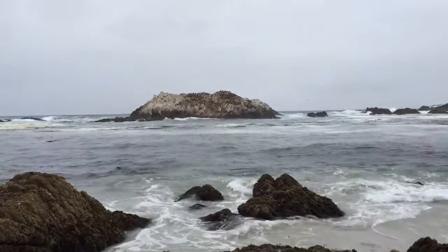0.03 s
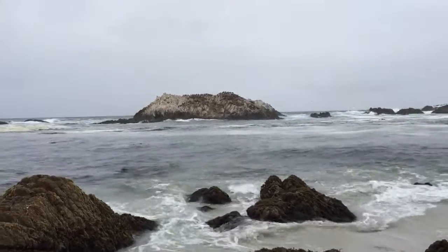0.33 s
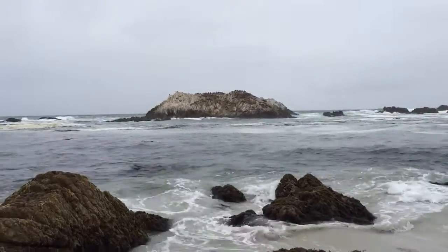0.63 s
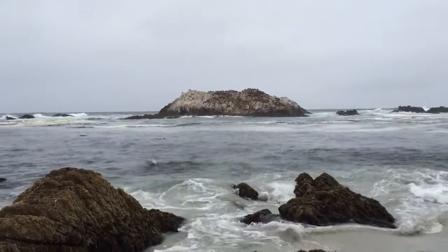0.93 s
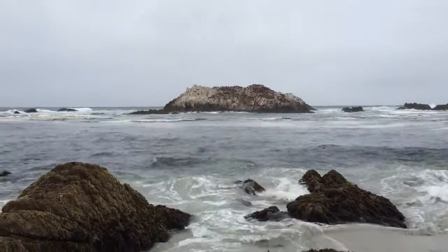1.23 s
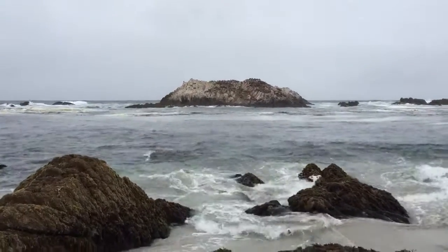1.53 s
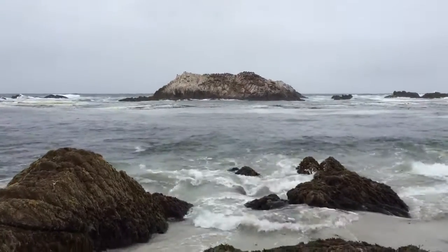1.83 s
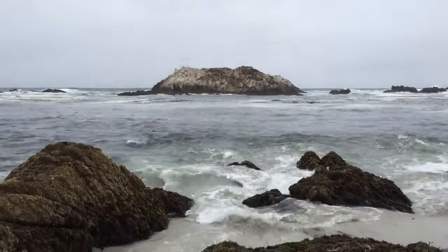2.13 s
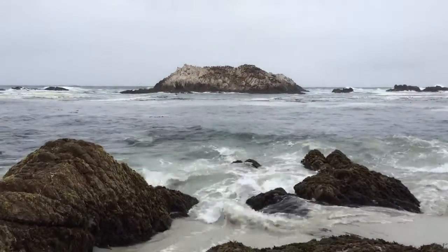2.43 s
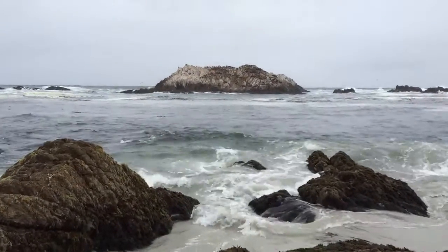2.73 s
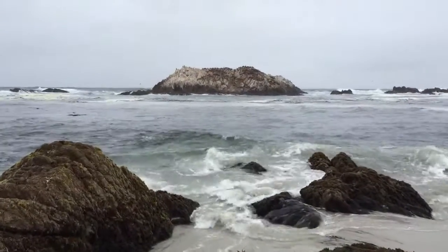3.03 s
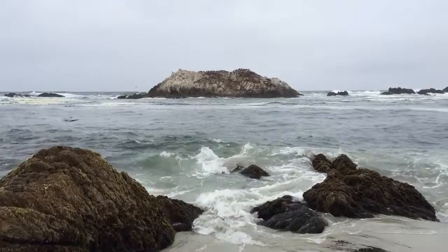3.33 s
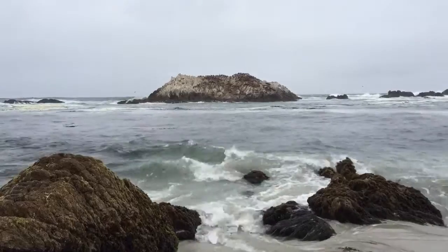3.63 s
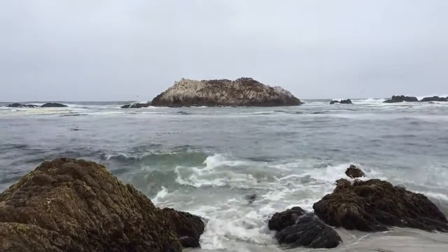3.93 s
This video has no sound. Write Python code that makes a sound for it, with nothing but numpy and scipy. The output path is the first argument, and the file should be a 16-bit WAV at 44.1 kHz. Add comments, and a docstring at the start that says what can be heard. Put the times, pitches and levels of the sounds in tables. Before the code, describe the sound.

Ocean surf roars steadily around shore rocks for the whole four seconds, with gusty wind rumbling on the microphone. Short wind thumps come irregularly, strongest at about 1.4 and 3.1 seconds. A few faint splashes spatter close by around 1.2 seconds. Foam hisses, bubbles and fizzes between the rocks, building from about 1.5 seconds and loudest near the end as the next wave approaches.

```python
"""A steady roar of breakers on shore rocks, under gusts of wind that rumble on the microphone.
Single eddies thump the microphone as smooth pressure pulses.
Foam washes in between the rocks: its bubbles ring and its froth bursts, hissing and fizzing
louder as the next wave draws near. A few small splashes spatter close by."""
import sys
import numpy as np
from scipy import signal
from scipy.fft import rfft, irfft
from scipy.io import wavfile
from scipy.ndimage import uniform_filter1d

SR = 44100
rng = np.random.default_rng(int(sys.argv[2]) if len(sys.argv) > 2 else 0)


def wav_out(sig):
    """Save sig, one row per channel (or a flat mono array), as 16-bit PCM at SR to the path in sys.argv[1]."""
    wavfile.write(sys.argv[1], SR, np.round(np.clip(np.atleast_2d(sig).T, -1, 1) * 32767).astype(np.int16))


N = 176400
T = np.arange(N) / SR
FREQS_HZ = np.fft.rfftfreq(N, 1 / SR)
TOP_HZ = 15300


def undb(db):
    """Decibels to gain."""
    return 10 ** (np.asarray(db) / 20)


def unit(x):
    """Scale to rms 1."""
    return x / np.sqrt(np.mean(x ** 2) + 1e-18)


def curve(rows):
    """Gain over time from (s, dB) points."""
    return undb(np.interp(T, *np.array(rows).T))


def walk(rate_hz):
    """Smooth random drift, mean 0, rms 1."""
    lowpass = np.exp(-(FREQS_HZ / rate_hz) ** 2) * (FREQS_HZ > 0)
    return unit(irfft(rfft(rng.standard_normal(N)) * lowpass, N))


def colour(x, spectrum):
    """Filter x by (Hz, dB) points, then scale to rms 1."""
    hz, db = np.array(spectrum).T
    gain = undb(np.interp(np.log(FREQS_HZ + 1), np.log(hz), db))
    return unit(irfft(rfft(x) * gain, N))


def add(out, start_s, x):
    """Mix x into out."""
    i = int(np.clip(start_s * SR, 0, N - 1))
    out[i:i + len(x)] += x[:N - i]


def churn(spectrum, flicker_hz, surge_db, flicker_db, bands=14):
    """Noise whose bands surge together and flicker alone, like tumbling water."""
    band_position = np.interp(np.log(FREQS_HZ + 1), np.log([300, TOP_HZ]), [0, bands - 1])
    noise_bins = rfft(colour(rng.standard_normal(N), spectrum))
    out = np.zeros(N)
    for k in range(bands):
        band = irfft(noise_bins * np.maximum(1 - abs(band_position - k), 0), N)
        out += band * undb(flicker_db * walk(flicker_hz))
    return unit(out * undb(surge_db * walk(flicker_hz / 2)))


def wind(steadiness=0.6, span_s=0.074):
    """Turbulence at the microphone: a low rumble whose strength follows the gusts."""
    # Each row: time in seconds, relative level in dB.
    gusts = [(0, -21.5), (.22, -23.5), (.41, -29), (.45, -20.5), (.56, -25), (.62, -21), (.65, -27),
             (.77, -30.5), (.94, -23), (1.12, -25), (1.18, -28.5), (1.32, -28), (1.35, -23.5), (1.42, -27),
             (1.47, -23), (1.69, -24), (1.75, -24), (1.81, -25.5), (2.17, -22), (2.24, -30.5), (2.31, -22),
             (2.39, -27), (2.64, -21.5), (2.71, -29), (2.82, -24.5), (2.93, -24), (3.0, -31.5),
             (3.12, -22.5), (3.39, -25), (3.5, -28.5), (3.56, -23), (3.7, -23), (3.85, -28), (4, -26)]
    # Each row: frequency in Hz, relative density in dB.
    spectrum = [(20, -44), (30, -29), (40, -16.5), (52, -2.5), (62, -2), (85, -0.5), (118, 0), (160, -3.5),
                (230, -7.5), (320, -11.5), (430, -21), (700, -29), (1500, -59)]
    rumble = colour(rng.standard_normal(N), spectrum)
    power = uniform_filter1d(rumble ** 2, int(span_s * SR))
    power = uniform_filter1d(power, int(span_s * SR / 2))
    steadied = unit(rumble / power ** (steadiness / 2))
    return steadied * curve(gusts) * undb(0.05)


def eddies(width_cycles=0.18, low_hz=128):
    """Each eddy is one smooth pressure pulse; the microphone's bass roll-off makes it swing back."""
    # Each row: time in seconds, relative peak in dB, nominal frequency in Hz.
    thumps = [(.191, -20, 220), (.447, -11.5, 170), (0.527, -13.5, 287), (.610, -14.5, 140),
              (.676, -16, 302), (1.107, -14.5, 200), (1.353, -7.5, 238), (1.459, -11.5, 171),
              (1.517, -15.5, 256), (1.755, -12.5, 171), (2.163, -15.5, 210), (2.303, -13.5, 228),
              (2.496, -15, 300), (3.142, -7, 282), (3.240, -17, 210), (3.460, -15.5, 308),
              (3.682, -18, 130), (3.940, -12.5, 280)]
    out, t = np.zeros(N), T[:SR // 10]
    for time_s, db, hz in thumps:
        pulse = np.exp(-((t - t.mean()) * hz / width_cycles) ** 2 / 2)
        rolloff = signal.butter(4, np.sqrt(low_hz * hz / 2), "high", fs=SR, output="sos")
        thump = signal.sosfilt(rolloff, pulse)
        add(out, time_s - t.mean(), thump / abs(thump).max() * undb(db + 1.5))
    return out


def splashes(low_hz=5500, attack_s=.0007):
    """Short bright spatters of water on rock."""
    # Each row: start in seconds, level in dB, decay in seconds.
    spatters = [(1.124, -42, .006), (1.180, -36, .003), (1.262, -41, .014), (1.279, -45, .008)]
    envelope = np.zeros(N)
    for start_s, db, decay_s in spatters:
        add(envelope, start_s, undb(db) * (1 - np.exp(-T / attack_s)) * np.exp(-T / decay_s))
    highpass = signal.butter(2, low_hz, "high", fs=SR, output="sos")
    return envelope * unit(signal.sosfilt(highpass, rng.standard_normal(N)))


def spray(ticks_per_sample=.01):
    """Bursting froth: a fine hiss with tiny droplet ticks."""
    # Each row: time in seconds, relative level in dB.
    fizz = [(0, -48.5), (.5, -46.5), (.88, -46), (1.04, -47.5), (1.45, -45.5), (1.6, -44), (2.0, -43.5),
            (2.4, -44.8), (2.52, -43), (3.15, -43.5), (3.3, -41.5), (3.7, -41.5), (3.92, -39.5),
            (4.0, -41.5)]
    # Each row: frequency in Hz, relative density in dB.
    spectrum = [(2500, -19), (4900, -4), (5700, 2), (6900, 1), (7600, -2), (8700, -0.5), (9900, -3),
                (10450, -7.5), (11100, -3.5), (13000, -6), (15200, -7.5)]
    ticks = colour(rng.standard_normal(N) * (rng.random(N) < ticks_per_sample), spectrum)
    hiss = churn(spectrum, flicker_hz=20, surge_db=0.4, flicker_db=0.7)
    return (hiss * undb(-2) + ticks * undb(-12)) * curve(fizz)


def bubbles(low_hz, high_hz, spread_db, count=3000, life_cycles=12, rise_per_life=0.073):
    """Many small bubbles, each ringing briefly with rising pitch."""
    out = np.zeros(N)
    for when, pitch, rarity in rng.random((count, 3)):
        hz = low_hz * (high_hz / low_hz) ** pitch
        age = np.arange(int(4 * life_cycles * SR / hz)) * hz / SR / life_cycles  # in lives
        phase = 2 * np.pi * life_cycles * age * (1 + rise_per_life * age / 2)
        level_db = -spread_db * np.log(max(rarity, .01))  # many faint, few loud
        add(out, when * N / SR, np.sin(phase) * np.exp(-2 * age) * undb(level_db))
    return unit(out)


def foam():
    """White water hisses and bubbles as it runs up between the rocks."""
    # Each row: time in seconds, relative level in dB.
    wash = [(0, -41.5), (.6, -39.5), (1.2, -39.3), (1.6, -37), (2.0, -37.5), (2.4, -38), (2.75, -34.5),
            (2.87, -37.5), (3.06, -34.5), (3.17, -35.5), (3.3, -34.5), (3.7, -34), (3.9, -33), (4.0, -33.5)]
    # Each row: frequency in Hz, relative density in dB.
    spectrum = [(600, -12), (1300, 4), (1800, -2), (2200, 0.5), (2600, -0.5), (3300, 0), (4100, -2.5),
                (4900, -9), (5700, -10), (7000, -16.5), (10000, -27), (15000, -38)]
    hiss = churn(spectrum, flicker_hz=19, surge_db=0.28, flicker_db=0.8)
    bubbling = colour(bubbles(low_hz=889, high_hz=8100, spread_db=3.5), spectrum)
    return (hiss * undb(-1) + bubbling * undb(-12)) * curve(wash)


def breakers():
    """The dull roar of waves tumbling over the rocks."""
    # Each row: time in seconds, relative level in dB.
    swell = [(0, -36.5), (.8, -36.5), (1.3, -34.5), (1.6, -36), (1.8, -33.5), (2.5, -34.5), (2.87, -33),
             (2.98, -31.5), (3.22, -34.5), (3.38, -32.5), (3.7, -33), (3.81, -34), (4, -32.5)]
    # Each row: frequency in Hz, relative density in dB.
    spectrum = [(100, -14), (300, -3), (470, -5), (600, 0), (820, -3), (1050, -3.5), (1350, -7),
                (1800, -13.5), (2600, -23), (6000, -44)]
    roar = churn(spectrum, flicker_hz=30, surge_db=.25, flicker_db=1.0)
    return roar * curve(swell) * undb(0.86)


def scene():
    """Surf plus wind on the microphone, mono."""
    return (breakers() + foam() + spray() + splashes() + wind() + eddies())[None]


def record(dry):
    """Steep low-pass at TOP_HZ."""
    return signal.sosfilt(signal.ellip(12, .1, 80, TOP_HZ, fs=SR, output="sos"), dry)


dry = scene()
out = record(dry)
wav_out(out)
```